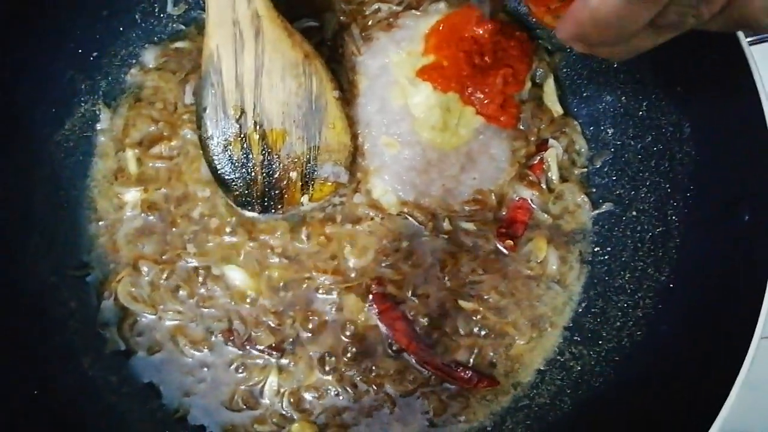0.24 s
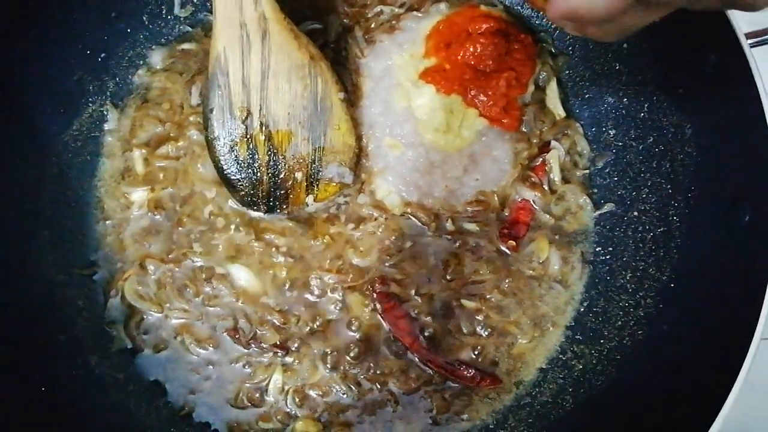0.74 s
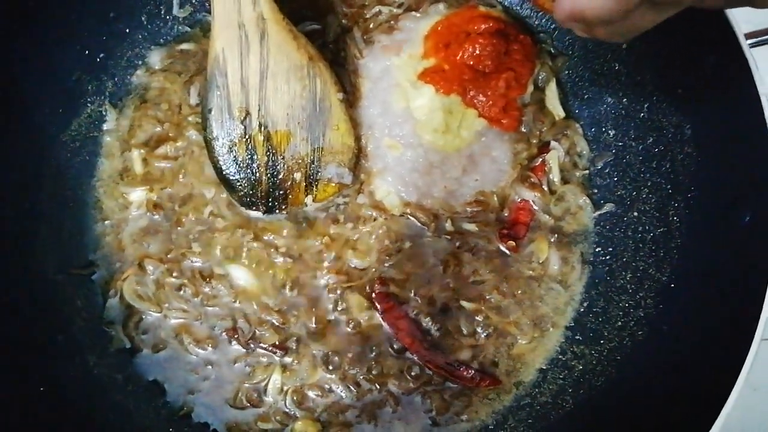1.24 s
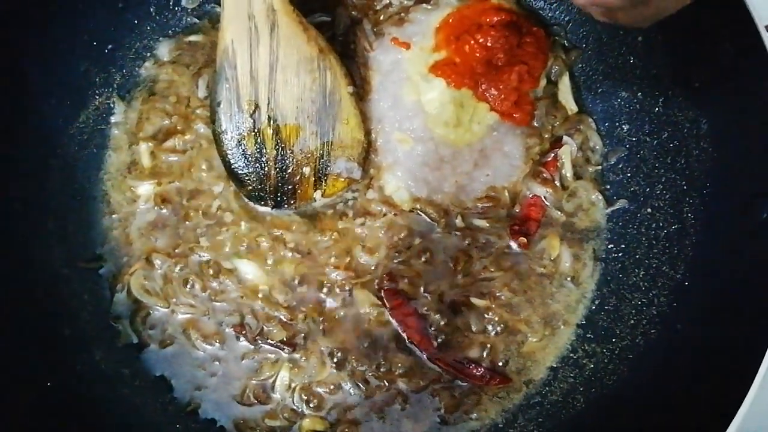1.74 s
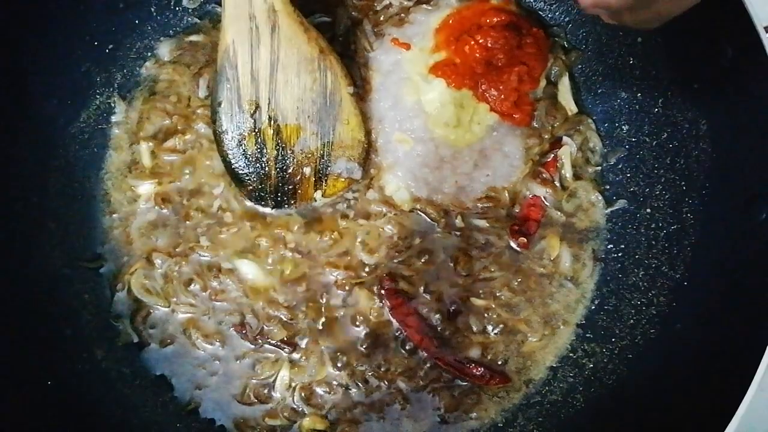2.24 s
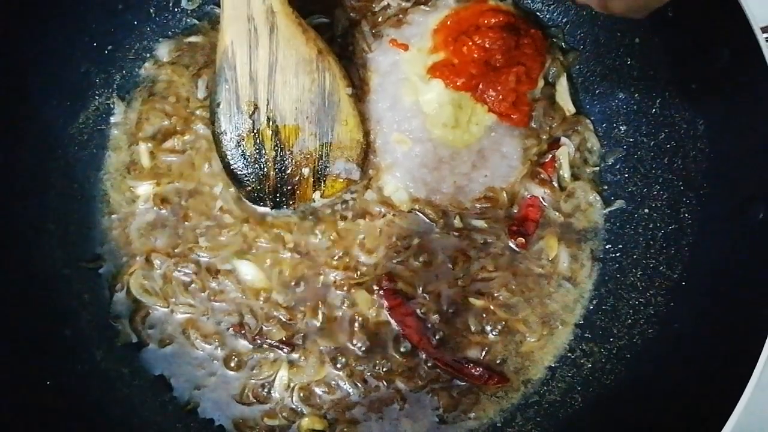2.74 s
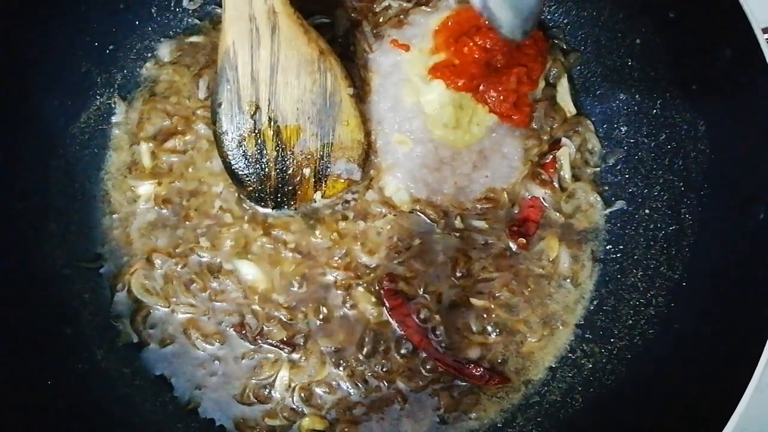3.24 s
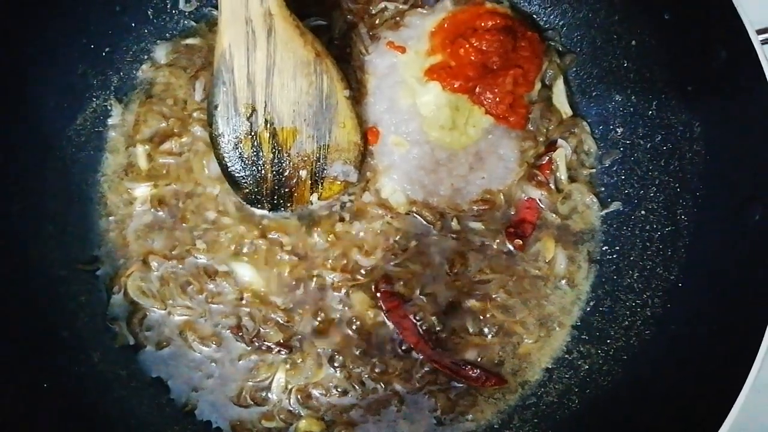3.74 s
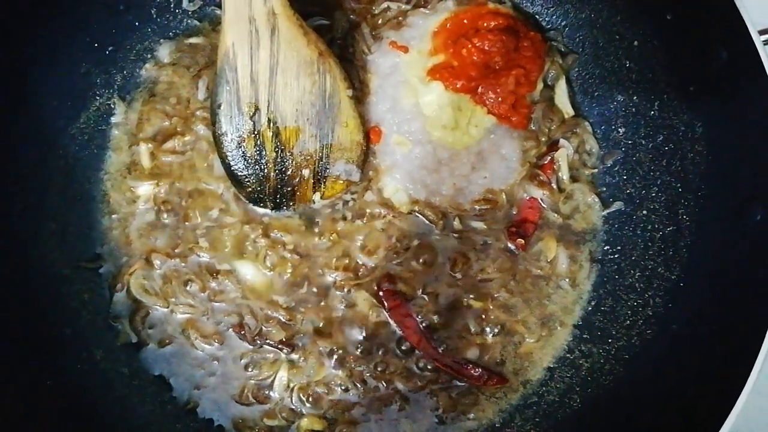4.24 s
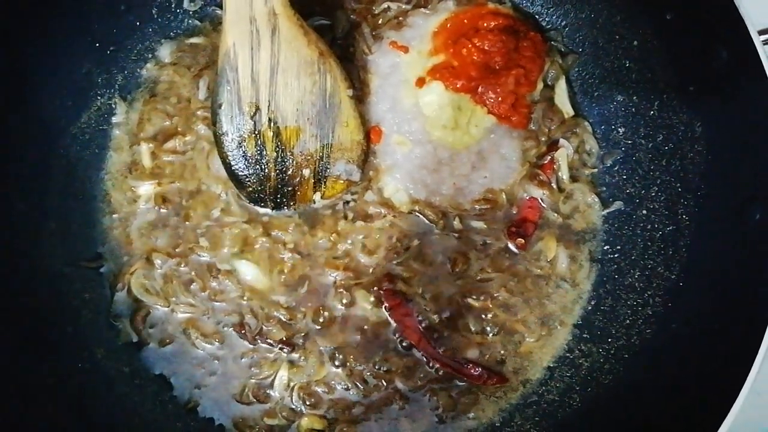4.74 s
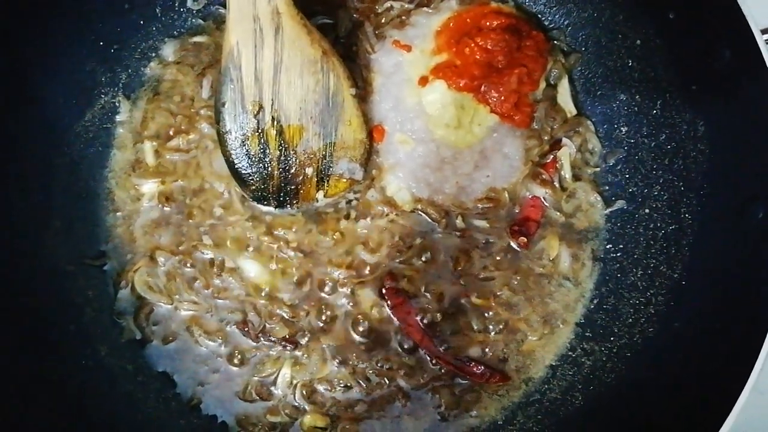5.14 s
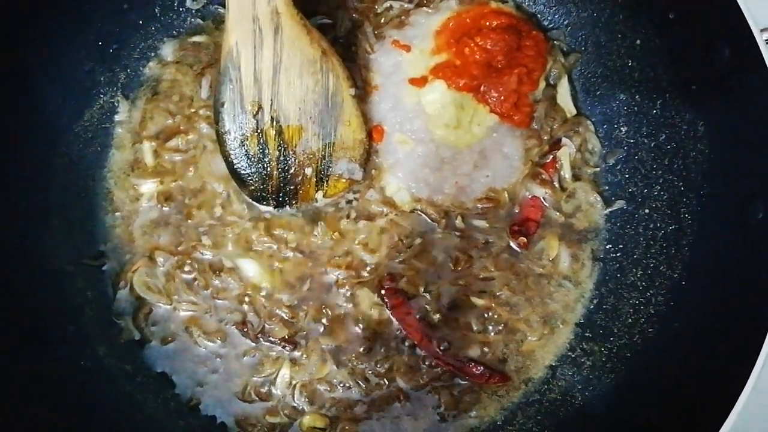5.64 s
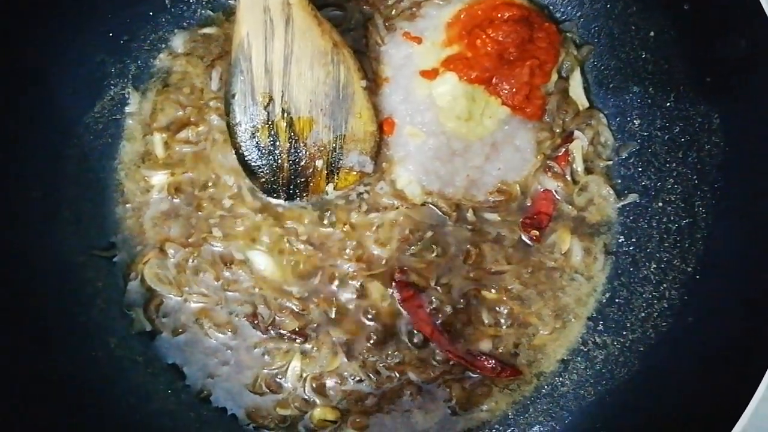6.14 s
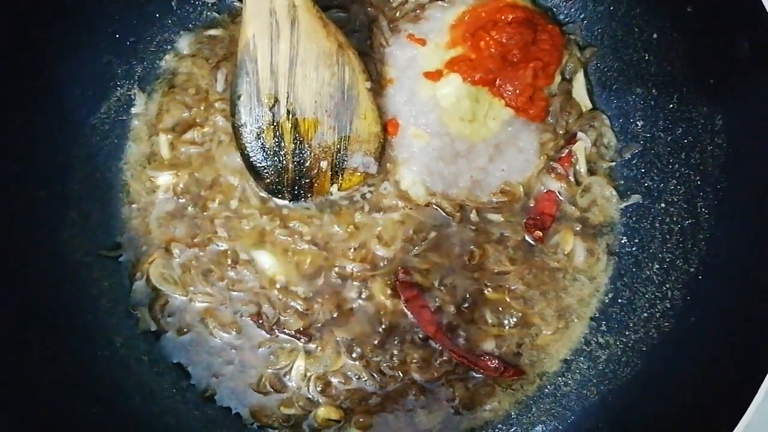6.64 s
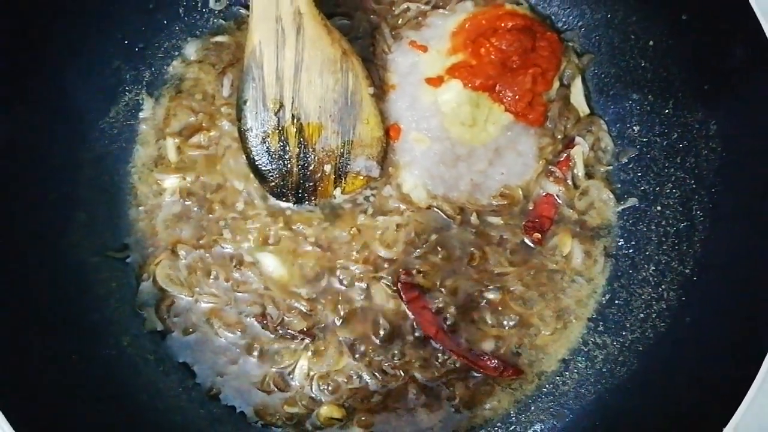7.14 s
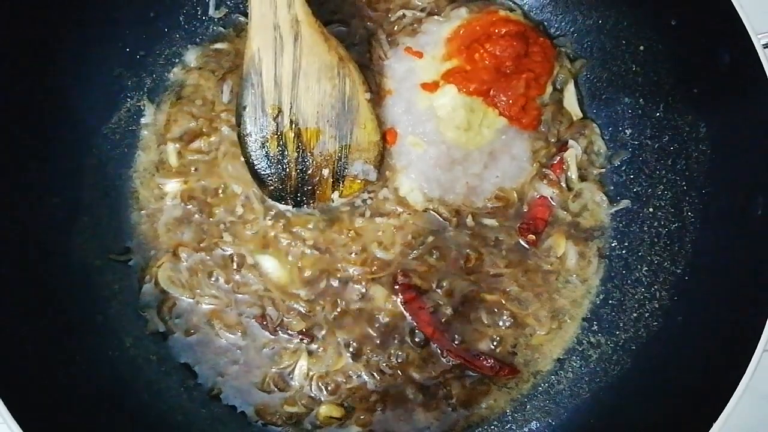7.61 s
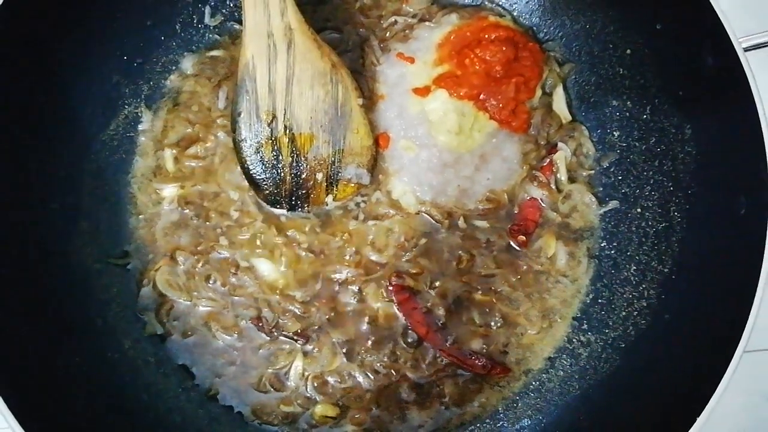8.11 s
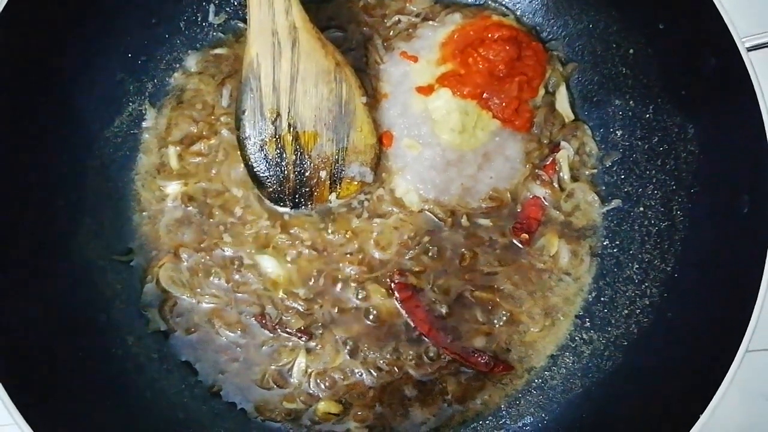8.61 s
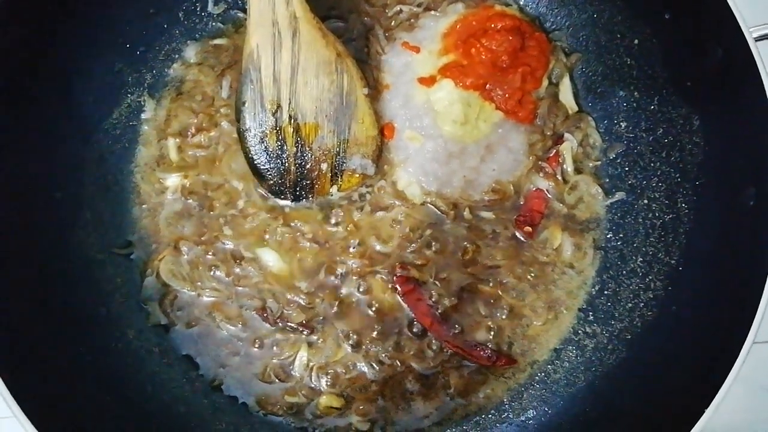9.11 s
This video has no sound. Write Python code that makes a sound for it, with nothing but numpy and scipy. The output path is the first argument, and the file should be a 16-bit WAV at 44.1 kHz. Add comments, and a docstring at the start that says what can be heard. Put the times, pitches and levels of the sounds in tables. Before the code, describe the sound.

Close stereo pickup in a small, lively kitchen. A steel spoon taps a bowl in quick irregular clanks with short scrapes for about five seconds, slightly left. It is put down with a ringing rattle, then onions keep frying with fine hiss and sharp steam pops. Later, dull worktop bumps come with a metallic clink. Low rumble and faint motor hum lie underneath.

```python
"""A steel spoon taps a bowl close to a stereo pair of microphones, over a pan of onions frying in oil.
It also scrapes paste out, is put down ringing, and later three dull bumps and clinks come from the worktop.
Spoon, bowl and cutlery are resonant modes driven by rough contact; the oil is random ringing bubbles,
snapping steam pops and flickering hiss; behind them lie noise rumble, wandering motor tones and bumps.
A dense decaying echo places the spoon, cutlery and frying in a small kitchen."""
import sys
import numpy as np
from scipy import signal
from scipy.fft import rfft, irfft, next_fast_len
from scipy.io import wavfile

SR = 44100
rng = np.random.default_rng(int(sys.argv[2]) if len(sys.argv) > 2 else 0)


def materialize(psi):
    """Save the field psi as 16-bit PCM at rate SR to the path in sys.argv[1].

    A 1-D psi becomes a single channel; in a 2-D psi each row is a channel.
    """
    bounded = np.clip(np.atleast_2d(psi).T, -1, 1)
    quanta = np.round(bounded * 32767).astype(np.int16)
    wavfile.write(sys.argv[1], SR, quanta)


N = 413216
TIME = np.arange(N) / SR
HIT_TIME = TIME[:SR // 11]


def from_db(db):
    """Turn decibels into an amplitude gain."""
    return 10 ** (np.asarray(db) / 20)


def rms_one(x):
    """Scale to rms 1."""
    return x / np.sqrt(np.mean(x ** 2) + 1e-20)


def level_one(sound, contact_s):
    """Scale a stereo hit to rms 1 over its contact and the 8 ms after."""
    end = int((contact_s + .008) * SR)
    return sound / np.sqrt(np.mean(sound[:, :end] ** 2) + 1e-20)


def at_hz(points, hz):
    """Read a table on a log-frequency axis."""
    table = np.array(points)
    return np.interp(np.log(np.maximum(hz, 1)), np.log(table[:, 0]), table[:, 1])


def over_time(points):
    """Read a table of times and values along the whole scene."""
    return np.interp(TIME, *np.transpose(points))


def panned(left_over_right_db):
    """Give left and right gains of constant power."""
    half_db = left_over_right_db / 2
    return rms_one(from_db(np.array([[half_db], [-half_db]])))


def add(out, start_s, sound):
    """Mix a stereo sound in at a time."""
    start = max(round(start_s * SR), 0)
    out[:, start:start + sound.shape[1]] += sound[:, :N - start]


def highpass(x, hz):
    """Small bodies radiate no bass."""
    return signal.sosfilt(signal.butter(4, hz, "high", fs=SR, output="sos"), x)


def lowpass(x, hz):
    """Soften everything above a corner frequency."""
    return signal.sosfilt(signal.butter(4, hz, fs=SR, output="sos"), x)


def drift(rate_hz):
    """Slow random wandering with rms 1: noise smoothed by two equal poles."""
    step = 40   # samples between computed points
    r = np.exp(-2 * np.pi * rate_hz * step / SR)
    raw = rng.standard_normal(N // step + 2002)
    slow = signal.lfilter([1], [1, -2 * r, r * r], raw)[2000:]   # skip the settling-in
    return np.interp(np.arange(N) / step, np.arange(len(slow)), rms_one(slow))


def ring(clicks, hz, t60_s):
    """Each click sets a decaying sine ringing, falling 60 dB in t60_s."""
    r = from_db(-60 / (t60_s * SR))
    w = 2 * np.pi * hz / SR
    return signal.lfilter([0, np.sin(w)], [1, -2 * r * np.cos(w), r * r], clicks + 1e-18)


def settling(clicks, settle_s):
    """Each click dies away exponentially."""
    return signal.lfilter([1], [1, -np.exp(-1 / (settle_s * SR))], clicks)


# how alike noise is at the two microphones: freq_hz, likeness (1 = the same, 0 = unrelated)
LIKENESS = [(60, 1), (130, 0.96), (290, 0.9), (640, 0), (1400, 0.027), (3000, 0.019)]


def noise(spectrum, size=N):
    """Stereo noise of a given colour, alike in both channels in the bass; rms 1."""
    padded = next_fast_len(size)
    hz = np.arange(padded // 2 + 1) * SR / padded
    mid, side = rfft(rng.standard_normal((2, padded)))
    alike = np.clip(at_hz(LIKENESS, hz), -1, 1)
    both = np.sqrt(1 + alike) * mid + np.sqrt(1 - alike) * side * [[1], [-1]]
    return rms_one(irfft(both * from_db(at_hz(spectrum, hz)), padded)[:, :size])


# how long the kitchen echoes: freq_hz, t60_s
ROOM_T60 = [(200, 0.12), (1200, 0.26), (2600, 0.57), (7000, 0.46), (10000, 0.38), (15000, 0.26)]


def kitchen(feed, build_s):
    """Dense wall echoes build up and die away, each octave at its own rate."""
    t, echoes = TIME[:SR * 3 // 4], 0
    edges_hz = np.geomspace(150, 19200, 8)
    for low, high in zip(edges_hz, edges_hz[1:]):
        octave = signal.butter(2, [low, high], "band", fs=SR, output="sos")
        band = signal.sosfilt(octave, rng.standard_normal((2, len(t))))
        t60_s = at_hz(ROOM_T60, np.sqrt(low * high))
        echoes = echoes + band * np.exp(-np.log(1000) * t / t60_s)
    build_up = 1 - np.exp(-t / build_s)
    echoes = rms_one(echoes * build_up) / np.sqrt(len(t))
    return signal.fftconvolve(feed, echoes, axes=1)[:, :N]


# colour of the kitchen's rumble: freq_hz, relative level_db (per Hz)
RUMBLE = [(20, -6), (42, -8), (62, 5), (78, -2), (98, -1), (145, -13), (200, -9.5), (300, -8.5), (420, -8),
          (540, -12), (900, -10), (1700, -14), (3000, -20.5), (6000, -40)]
# swell of its deepest part: time_s, gain_db
DEEP_RUMBLE = [(0, -1), (1.4, -.5), (2.1, 4), (2.5, 0), (5.8, 0), (6.1, 2.5), (6.5, -1), (9.37, -0.5)]


def kitchen_rumble():
    """Low noise from the room; only the deepest part swells and sinks."""
    rumble = from_db(-48.5) * noise(RUMBLE)
    bass = signal.sosfiltfilt(signal.butter(2, 130, fs=SR, output="sos"), rumble)
    swell = from_db(over_time(DEEP_RUMBLE) + 1.0 * drift(3.1))
    return rumble + bass * (swell - 1)


def wavering(hz, spread_hz):
    """A motor line whose pitch and strength wander; rms 1."""
    pitch_hz = hz + spread_hz * drift(5.06)
    strength = 1 + drift(4.7) / 10
    return rms_one(strength * np.sin(2 * np.pi * np.cumsum(pitch_hz) / SR))


# lines of the motor hum: pitch_hz, level_db, pitch_spread_hz
HUM = [(62.9, -59, 5.97), (267, -72, 3.98), (372, -58.5, 2.02), (426.6, -62, 3.846), (1091, -75.5, 4.2)]
# level of the thin whine: time_s, level_db
WHINE = [(0, -68), (5.1, -70), (5.6, -66), (7.5, -64), (9.37, -64)]


def motors():
    """Wavering sines make a hum a little to the left and a thin central whine."""
    hum = sum(from_db(level_db) * wavering(hz, spread_hz) for hz, level_db, spread_hz in HUM)
    whine = from_db(over_time(WHINE)) * wavering(hz=1883, spread_hz=4.34)
    return hum * panned(1.0) + whine


# dull bumps on the worktop, further off: start_s, level_db, length_s, top_hz
BUMPS = [(7.975, -44, 0.099, 560), (8.303, -41.5, 0.066, 1000), (8.381, -39.5, 0.076, 804)]


def bumps(low_hz, fade_s):
    """Something is shifted on the worktop: low noise holds briefly, then fades."""
    out, t = np.zeros((2, N)), TIME[:SR // 2]
    for start_s, level_db, length_s, top_hz in BUMPS:
        colour = [(low_hz / 2, -25), (low_hz, 0), (top_hz / 2, -1),
                  (top_hz, -7), (top_hz * 3, -30), (top_hz * 10, -75)]
        fade = np.exp(-np.maximum(t - length_s, 0) / fade_s)
        add(out, start_s, from_db(level_db) * noise(colour, size=len(t)) * fade)
    return out


# colour of the smooth frying hiss: freq_hz, relative level_db (per Hz)
HISS = [(1500, 1.5), (3000, -20), (4600, 0.5), (5600, 2), (7000, 3.5), (8000, 8), (9000, -3.5),
        (10000, -11), (12500, -23), (16000, -40)]


def frying_hiss():
    """The finest bubbles merge into noise that flickers within milliseconds."""
    flicker_db = 0.36 * drift(26) + 1.6 * drift(140)
    return from_db(-54.0) * noise(HISS) * from_db(flicker_db)


# strength of bursting bubbles by pitch: pitch_hz, relative level_db
FIZZ = [(2500, -41), (3300, -8), (4500, -1.5), (5500, -9), (6800, -10), (8000, 9), (9000, -22),
        (10000, -32), (14000, -32)]


def bubbles(per_s, spread_db, cycles, surge_db, count=18):
    """Tiny steam bubbles burst at random all over the pan, each ringing a few cycles; rms 1."""
    out, surge = np.zeros((2, N)), from_db(surge_db * drift(11))
    for hz in np.geomspace(2500, 13000, count):
        born = np.flatnonzero(rng.random(N) < per_s / count * surge / SR)
        size_db = spread_db * np.minimum(rng.exponential(1, len(born)), 4.5)
        sizes = from_db(size_db) * rng.choice([-1, 1], len(born))
        # low bubbles lie mostly to the left, high ones to the right
        side_db = rng.normal(1.0 if hz < 6500 else -1.0, 1.2, len(born))
        lag = rng.integers(-20, 20, len(born))   # samples between the microphones
        clicks = np.zeros((2, N))
        clicks[0, born] = sizes * from_db(side_db)
        clicks[1, (born + lag) % N] = sizes * from_db(-side_db)
        rung = ring(ring(clicks, hz, cycles / hz), hz, cycles / hz / 3)
        out += from_db(at_hz(FIZZ, hz)) * level_one(rung, N / SR)
    return rms_one(lowpass(out, 9500))


# the loudest steam pops in the oil: start_s, peak_db (before panning)
POPS = [(3.148, -27.5), (4.005, -25.5), (5.542, -27.5), (6.35, -17.5), (6.736, -27.5), (7.194, -28),
        (7.275, -26), (8.922, -26), (9.014, -25)]
POPS_PER_S, POP_DB, POP_SPREAD_DB = 3, -30.5, 2.1   # the random pops
POP_HZ, POP_SPREAD_HZ = 7920, 480   # all pops ring near one pitch
POP_PAN_DB = -5   # all lie to the right


def pops(t60_s, burst_s):
    """Larger bubbles snap with a short bright ring: a few loud ones among many at random."""
    out, t = np.zeros((2, N)), TIME[:SR // 50]
    random_s = TIME[rng.random(N) < POPS_PER_S / SR]
    random_pops = [(start_s, rng.normal(POP_DB, POP_SPREAD_DB)) for start_s in random_s]
    for start_s, peak_db in POPS + random_pops:
        hz = rng.normal(POP_HZ, POP_SPREAD_HZ)
        burst = rng.standard_normal((2, len(t))) * np.exp(-t / burst_s)
        snap = ring(ring(burst, hz, t60_s), hz, t60_s / 2)
        add(out, start_s, from_db(peak_db) * snap / np.abs(snap).max() * panned(POP_PAN_DB))
    return out


def contact_force(slide_s, slips_per_s, settle_s):
    """A tap is one brief chatter; a slide sticks and slips all along its length."""
    slipping = (rng.random(len(HIT_TIME)) < slips_per_s / SR) * (HIT_TIME < slide_s)
    slips = slipping * rng.uniform(0.19, 0.8, len(HIT_TIME))
    slips[0] = 1
    return settling(slips + 1e-18, settle_s)


LOWER_MODE_HZ, UPPER_MODE_HZ = 5850, 7150   # the two main regions of the metal's ring
# colour of the crack of contact: freq_hz, relative level_db (per Hz)
CRACK = [(900, -45), (1500, -33), (2500, -16), (4200, -9.5), (6000, 9), (8200, -4), (9000, -6.5),
         (11000, -5.5), (12500, -59), (16000, -32)]
# cutlery left to ring freely: start_s, level_db, rattle_s, others_db (modes away from 7 kHz), direct_db
CLINKS = [(6.062, -21, 0.01, -19.5, 1.5), (6.086, -23, .02, -46, 4), (6.14, -27, 0.0048, -28, 0.5),
          (6.229, -35, .006, -32, 2.5), (6.28, -39.5, 0.0044, -15, 2), (6.433, -37, 0.0072, -1, -3.5),
          (8.388, -33.5, .002, 4, 8.5), (8.398, -21.5, 0.046, -0.5, 0.5), (8.455, -28, 0.067, 0.5, -3)]
# its modes: pitch_hz, level_db, t60_s
CUTLERY = [(2566, -8.5, 0.023), (4695, -7.5, 0.09), (6090, -1, 0.018), (5950, -4, 0.096), (6600, -2, 0.028),
           (6160, 2.5, 0.0091), (6910, -15, 0.15), (7100, 1.5, 0.053), (7140, -8, 0.18), (8100, -2.5, 0.05),
           (8630, -15, 0.15), (9850, -14.5, 0.042), (10900, -22, 0.047), (12990, -18, 0.041),
           (14480, -18, .03)]


def cutlery(crack_db):
    """Loose metal chatters on the worktop and rings on, close modes beating; returns direct and room feed."""
    direct, feed = np.zeros((2, N)), np.zeros((2, N))
    for start_s, level_db, rattle_s, others_db, direct_db in CLINKS:
        force = contact_force(rattle_s, slips_per_s=250, settle_s=0.0026)
        force = np.pad(force, (0, SR // 3))   # time to ring on
        push = force * rng.standard_normal(len(force))
        # the right channel lags by 26 samples
        push = np.array([push, np.pad(push, (26, 0))[:len(push)]])
        modes = 0
        for hz, mode_db, t60_s in CUTLERY:
            # modes near 7 kHz always sound; the share of the others depends on the touch
            share_db = others_db * (abs(hz - UPPER_MODE_HZ) > 400)
            rung = ring(ring(push, hz, 14 / hz), hz, t60_s)
            modes = modes + from_db(mode_db + share_db) * level_one(rung, rattle_s)
        crack = force * noise(CRACK, size=len(force))
        crack = level_one(lowpass(highpass(crack, 8000), 12500), rattle_s)
        clink = from_db(level_db) * (level_one(modes, rattle_s) + from_db(crack_db) * crack)
        add(direct, start_s, clink * from_db(direct_db))
        # less direct sound goes with more room
        add(feed, start_s, clink * from_db(0.5 - 0.73 * direct_db))
    return direct, feed


def struck(modes, gains_db, force, slide_s):
    """A rough contact rings damped modes, which reach the left microphone a little earlier."""
    push, out = force * rng.standard_normal(len(force)), 0
    for (hz, width_hz, level_db), extra_db in zip(modes, gains_db):
        # the hand and the paste damp every mode and detune it a little
        hz = hz * (1 + rng.normal(0, .02 if hz < 5500 else .005))
        damped_hz = max(width_hz, 75 if hz > 5000 else 130)
        left = ring(ring(push, hz, 5 / hz), hz, np.log(1000) / (np.pi * damped_hz))
        right = np.pad(left, (rng.integers(23, 34), 0))[:len(left)]
        out = out + from_db(level_db + extra_db) * level_one(np.array([left, right]), slide_s)
    return level_one(out, slide_s)


# modes of spoon and bowl, damped by the hands: pitch_hz (nominal), width_hz (raised if too narrow), level_db
SPOON = [(2216, 37, -15), (2598, 37, -7), (3166, 50, -21.5), (3604, 48, -11), (3810, 43, -10.5),
         (4300, 53, -38.5), (4825, 40, -7.5), (5030, 170, -9.5), (5906, 80, 0.5), (6090, 180, -1.5),
         (6470, 300, -4.5), (6370, 98, -4), (7143, 57, 7.5), (7580, 57, -0.5), (8106, 35, 4),
         (9100, 67, -28), (9780, 140, -10), (10350, 110, -15), (10100, 110, -45), (13400, 200, -31),
         (14400, 370, -4.5), (15700, 150, -30)]
# modes of the hollow knock of the bowl: the same columns
KNOCK = [(1145, 240, -2.5), (1352, 180, 10.5), (1520, 120, 5.5), (1853, 120, 4), (2050, 93, 1.5)]
# taps on the bowl: start_s, ring_db, knock_db, lean_db, bright_db (per octave)
# the first row is the faint ringing-out of a tap just before the scene opens
# lean_db is what the upper main mode gains and the lower loses at that spot
TAPS = [(0.002, -33.5, -67, -15, 0), (0.1171, -14, -32.5, 10.5, 7), (0.411, -48, -39, 2, 2),
        (0.8065, -15.5, -43, -5.5, -0.5), (1.042, -42, -36, 14, 2), (1.078, -28.5, -41.5, -8, 0),
        (1.123, -19, -55, -5, -3), (1.323, -49, -35, 8, -4), (1.357, -14, -48, -6, -1),
        (1.6243, -17.5, -36.5, -4, -2), (1.67, -28, -57, 0, -4.5), (1.936, -17, -50, -12, 1.5),
        (2.1372, -15, -33, 1.5, 12.5), (2.211, -22.5, -58, -17, 3), (2.409, -12.5, -30, 7, 1.5),
        (2.452, -23, -53, -9, 2), (2.674, -16.5, -33.5, 2.5, 8), (2.746, -17.5, -60, -7, 4.5),
        (2.933, -22.5, -46, -0.5, 2), (3.304, -15.5, -28, -2.5, -2), (4.1647, -21, -45.5, 2, -4),
        (4.217, -26, -43, 12, -10), (4.259, -21, -41, -8, -8), (4.298, -18.5, -42, -11, 0),
        (4.311, -16, -49, 6.5, -7.5), (4.434, -16.5, -50, -5.5, 3), (4.7433, -11.5, -58, 6.5, 1),
        (5.048, -44, -36.5, -4, -2), (5.116, -24, -34, 6, 4)]
# scrapes along the bowl: start_s, slide_s, ring_db, knock_db
# the first row belongs to that same ringing-out; the one at 6.062 is the spoon scuffing as it is put down
SCRAPES = [(0.004, 0.032, -35.5, -65), (0.13, 0.038, -29.5, -48), (0.168, 0.033, -23, -44.5),
           (0.297, 0.018, -39, -67), (0.7385, 0.037, -32.5, -47), (0.787, .018, -23, -48),
           (1.097, 0.015, -24, -47), (1.34, .055, -36, -54), (1.886, .045, -32, -53),
           (1.95, .01, -26.5, -58), (2.423, 0.024, -28, -48), (2.687, 0.033, -26.5, -47),
           (2.967, 0.039, -28, -57), (4.267, 0.0081, -21.5, -47), (4.302, .006, -20.5, -43),
           (4.438, .007, -20.5, -50), (5.085, .028, -34, -39.5), (6.062, 0.029, -37, -50)]
TAP_S = 0.002   # a tap chatters this long
# a firm contact; lighter slides are duller, in dB per octave for each dB
FIRM_DB, BRIGHT_PER_DB = -18.5, 0.78
LIGHT_DB = -29.5   # a light contact
FIRM_ROOM_DB, LIGHT_ROOM_DB = -6, -3   # a light contact has the larger room share
BOWL_PAN_DB = 2.5   # the bowl is held a little to the left


def spoon(crack_db, crack_s, lean_width_hz, scatter_db):
    """Every touch of the spoon rings the same modes, by spot and firmness; returns direct and room feed."""
    direct, feed = np.zeros((2, N)), np.zeros((2, N))
    hz = np.array(SPOON)[:, 0]
    near_upper = np.exp(-((hz - UPPER_MODE_HZ) / lean_width_hz) ** 2)
    near_lower = np.exp(-((hz - LOWER_MODE_HZ) / lean_width_hz) ** 2)
    octaves = np.log2(np.clip(hz, 3500, 12000) / 6500)
    tap_s, _, _, tap_lean_db, _ = np.transpose(TAPS)
    taps = [(start_s, TAP_S, ring_db, knock_db, bright_db)
            for start_s, ring_db, knock_db, _, bright_db in TAPS]
    slides = [(start_s, slide_s, ring_db, knock_db, BRIGHT_PER_DB * (ring_db - FIRM_DB))
              for start_s, slide_s, ring_db, knock_db in SCRAPES]
    for start_s, slide_s, ring_db, knock_db, bright_db in taps + slides:
        # the spoon travels from the spot of one tap to that of the next
        lean_db = np.interp(start_s, tap_s, tap_lean_db)
        force = contact_force(slide_s, slips_per_s=650, settle_s=0.00049)
        gains_db = (near_upper - near_lower) * lean_db + octaves * bright_db
        gains_db = gains_db + scatter_db * rng.standard_normal(len(hz))
        modes = struck(SPOON, gains_db, force, slide_s)
        knock = struck(KNOCK, scatter_db * rng.standard_normal(len(KNOCK)), force, slide_s)
        knock = highpass(highpass(knock, 790), 790)
        # countless small modes blur into a brief crack; a hard edge makes it brighter
        colour = [(f, db + bright_db * (f > 10000)) for f, db in CRACK]
        crack = level_one(noise(colour, size=len(force)) * settling(force, crack_s), slide_s)
        clank = modes + from_db(crack_db) * crack
        clank = level_one(lowpass(highpass(clank, 2130), 11600), slide_s)
        hit = from_db(ring_db) * clank + from_db(knock_db) * knock
        room_db = np.interp(ring_db, [LIGHT_DB, FIRM_DB], [LIGHT_ROOM_DB, FIRM_ROOM_DB])
        add(direct, start_s, hit * panned(BOWL_PAN_DB))
        add(feed, start_s, hit * from_db(room_db))
    return direct, feed


def scene():
    """Pan and spoon close to the microphones, the rest further off in the room."""
    background = kitchen_rumble() + motors() + bumps(low_hz=210, fade_s=0.06)
    fizz = from_db(-52.5) * bubbles(per_s=1700, spread_db=4.5, cycles=14.0, surge_db=4)
    frying = fizz + pops(t60_s=0.0027, burst_s=0.001)
    clinks, clinks_feed = cutlery(crack_db=-16)
    hits, hits_feed = spoon(crack_db=-5, crack_s=0.0033, lean_width_hz=580, scatter_db=3.0)
    room = kitchen(hits_feed + clinks_feed + from_db(-8.5) * frying, build_s=0.00087)
    return background + frying_hiss() + frying + clinks + hits + room


def record(dry):
    """The hardest taps are rounded off below full scale and the treble is cut at 16 kHz."""
    top = .9   # ceiling of the rounding, full scale = 1
    rounded = dry / (1 + (dry / top) ** 8) ** (1 / 8)
    return signal.sosfilt(signal.ellip(10, .1, 80, 16000, fs=SR, output="sos"), rounded)


dry = scene()
out = record(dry)
materialize(out)
```